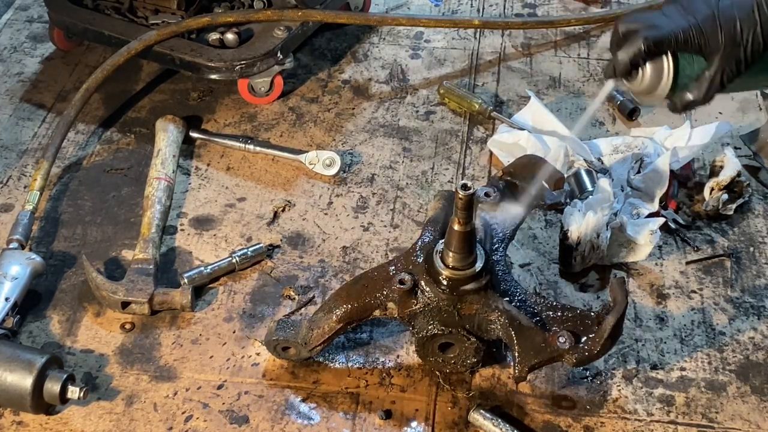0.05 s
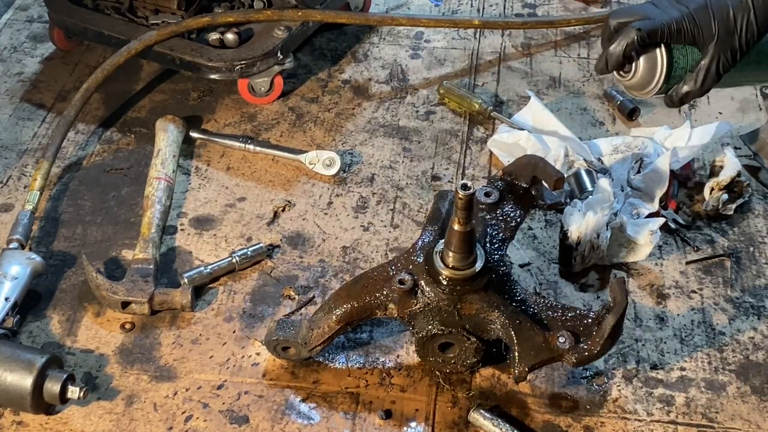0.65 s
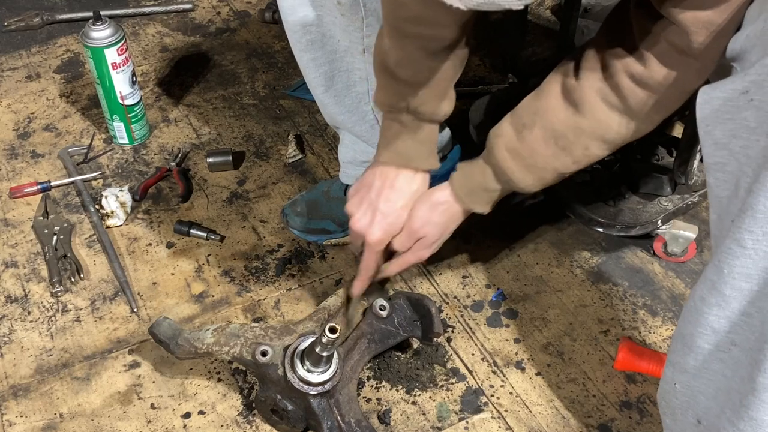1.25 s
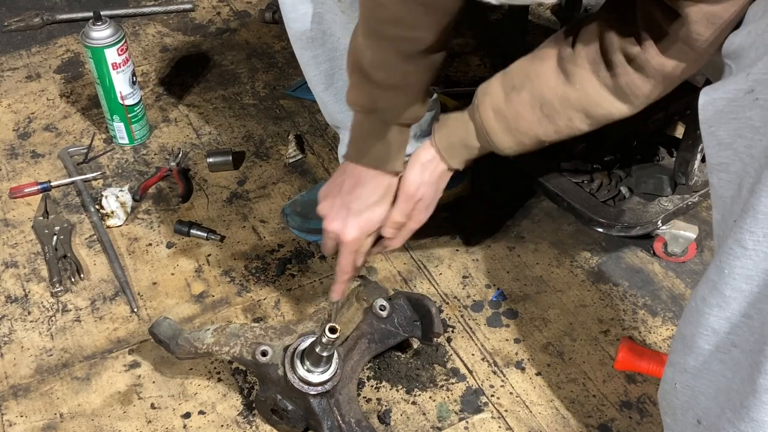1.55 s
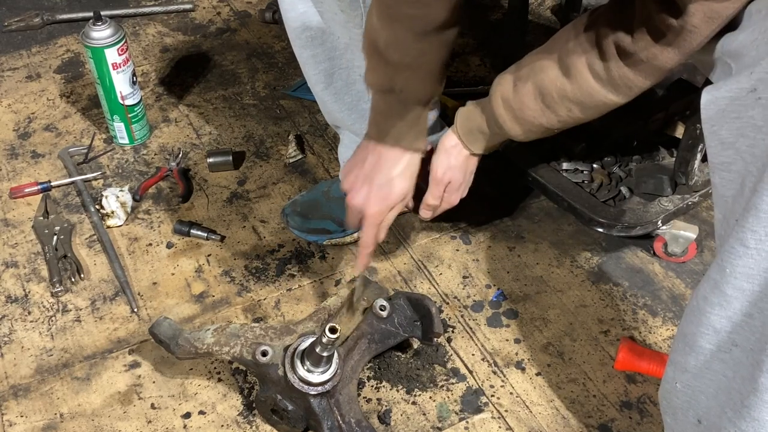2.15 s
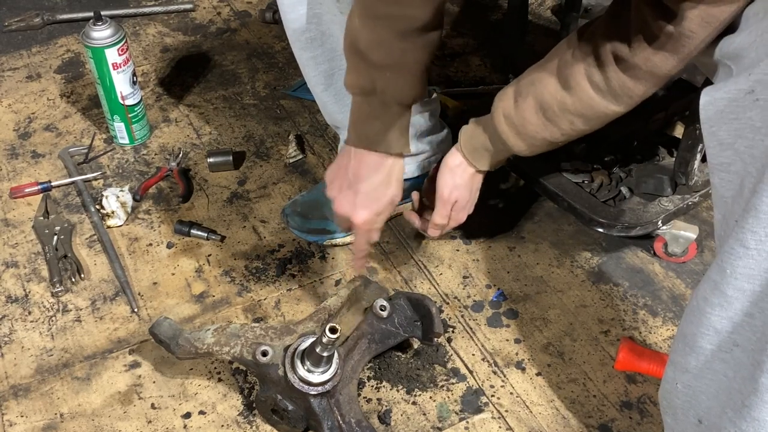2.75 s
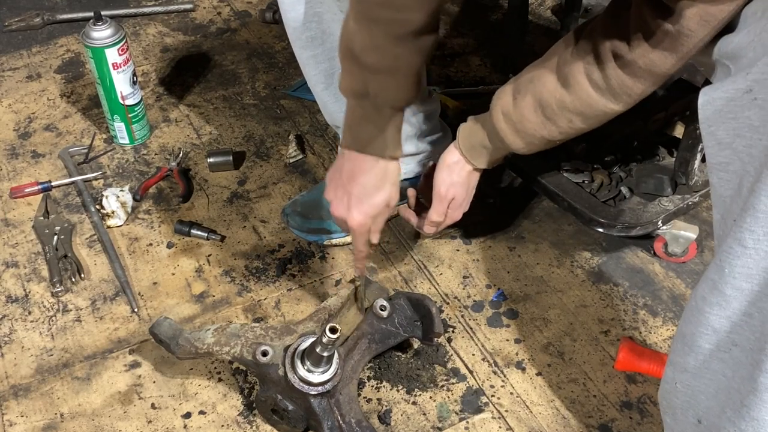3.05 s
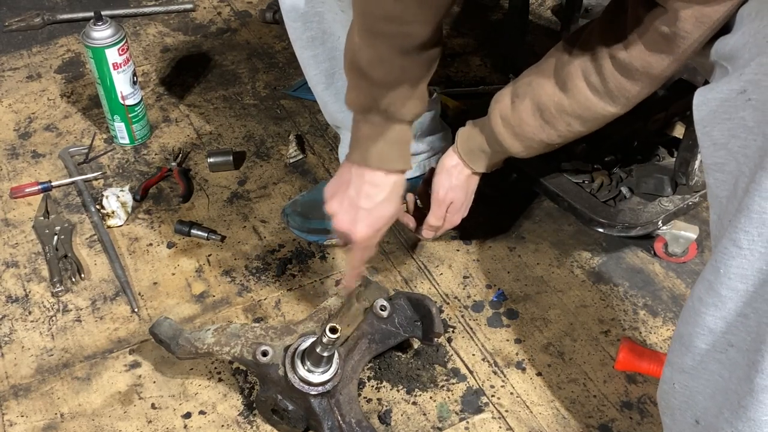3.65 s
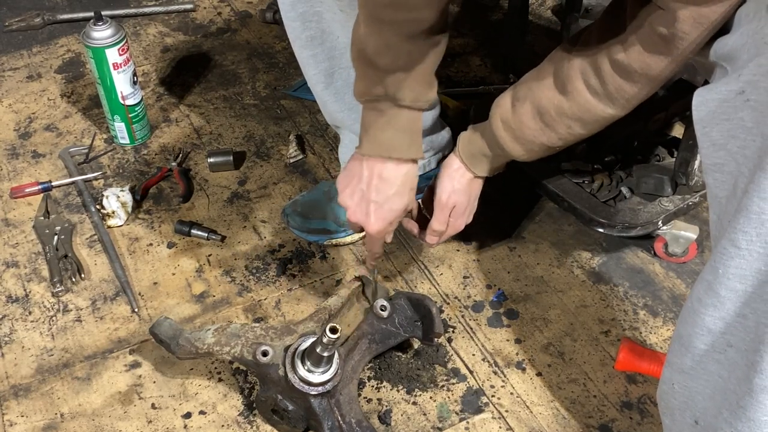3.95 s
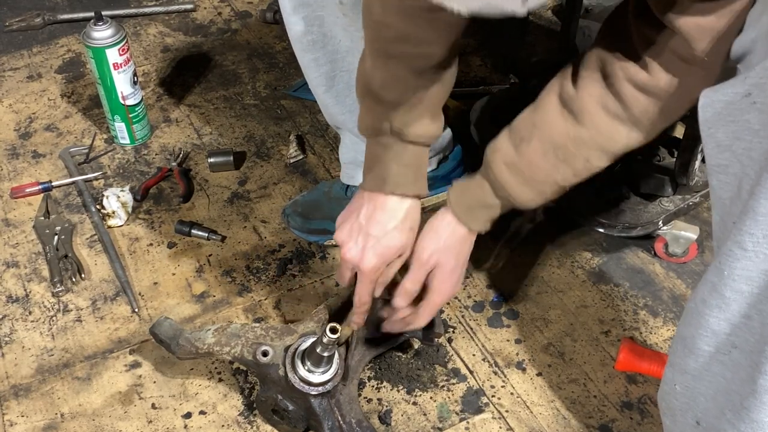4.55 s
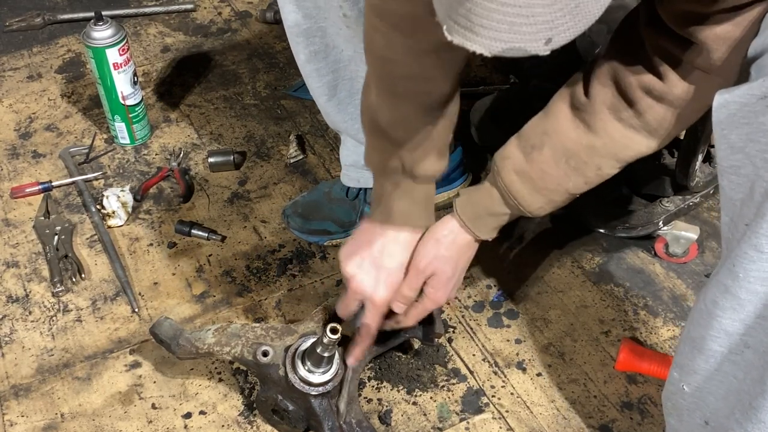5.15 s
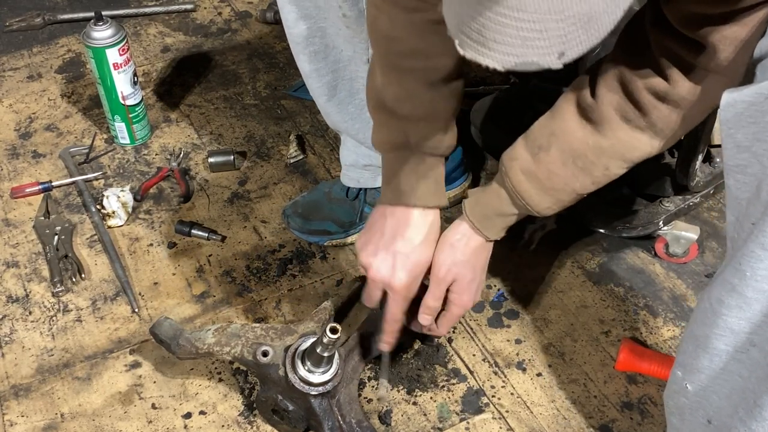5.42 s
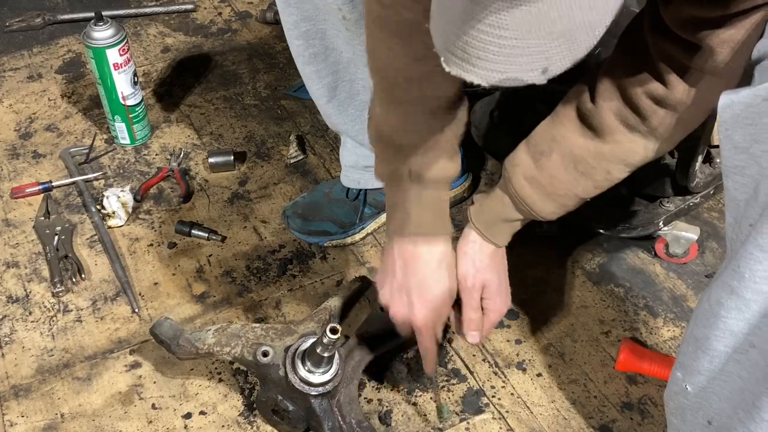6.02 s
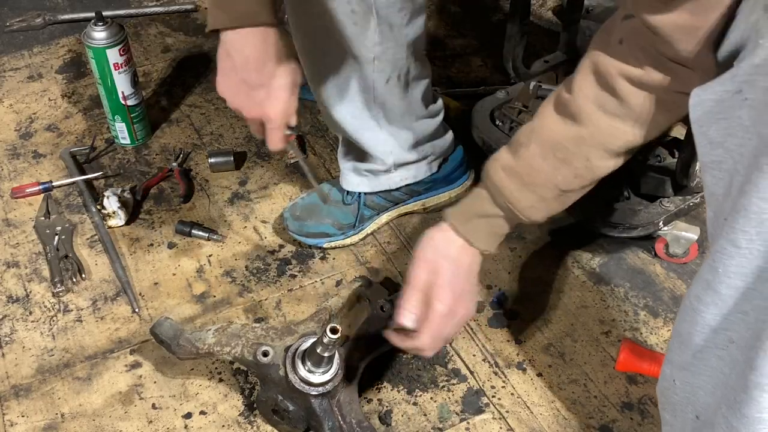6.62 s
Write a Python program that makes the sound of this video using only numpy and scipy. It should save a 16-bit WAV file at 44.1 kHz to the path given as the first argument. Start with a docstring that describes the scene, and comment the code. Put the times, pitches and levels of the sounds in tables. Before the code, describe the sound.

A brief spray hiss and heater roar cut off, followed by short wire brush scrapes on faintly ringing steel in a workshop.

```python
"""Spray cleaning and wire brushing

An aerosol can sprays a steel steering knuckle over the roar of a shop heater; then the scene changes. A hand
wire brush scrubs the knuckle in short strokes. Wires tick as they land and rasp as they slip, the casting rings
differently at each spot, and the workshop reflects the ticks and rasp."""
import sys
import numpy as np
from scipy import signal
from scipy.fft import rfft, irfft
from scipy.io import wavfile
from scipy.ndimage import uniform_filter1d

SR = 44100
rng = np.random.default_rng(int(sys.argv[2]) if len(sys.argv) > 2 else 0)


def unload_wav(signal):
    """Save mono or channel-first audio to the path in sys.argv[1] as 16-bit WAV at rate SR, clipped to [-1, 1]."""
    wavfile.write(
        sys.argv[1],
        SR,
        np.round(np.clip(np.atleast_2d(signal).T, -1, 1) * 32767).astype(np.int16),
    )


N = 298987
TIME_S = np.arange(N) / SR
FREQS_HZ = np.fft.rfftfreq(N, 1 / SR)

# Table levels are relative.
# brush strokes: start_s, length_s, level_db, wire_hz, ring_db
BRUSH_STROKES = [ (0.896, 0.015, -32, 1730, 6), (0.955, 0.087, -47.5, 1850, 8), (1.174, 0.15, -26, 2870, 2),
                 (1.554, 0.087, -23, 3000, 3), (1.919, 0.059, -21.5, 3750, 3),
                 (2.249, 0.022, -22.5, 2780, 4), (2.288, 0.036, -33.5, 2800, 14),
                 (2.615, 0.092, -22, 3660, -5), (2.945, 0.046, -20, 3280, 4.5),
                 (3.207, 0.061, -30, 3240, 9.5), (3.415, 0.01, -23.5, 2680, -6),
                 (3.437, 0.029, -15.5, 3670, -2.5), (3.642, 0.038, -17, 3600, -0.5),
                 (3.857, 0.033, -16.5, 3420, 7.5), (4.563, 0.084, -52, 1800, 3.5),
                 (4.744, 0.13, -36, 1330, 1.5), (4.933, 0.082, -34.5, 1460, 0),
                 (5.078, 0.094, -30, 3040, -4.5), (5.223, 0.067, -34.5, 1420, -9),
                 (5.593, 0.068, -25, 4140, 2.5), (5.934, 0.035, -19.5, 4197, 8),
                 (6.2, 0.01, -35, 2104, -5.5), ]
# head landing or wire snapping free: start_s, level_db, wire_hz
WIRE_TICKS = [(0.8943, -39.5, 3900), (1.011, -30.5, 3900), (1.056, -30, 3560), (1.0985, -28.5, 1840),
              (1.1512, -13.5, 2650), (1.1875, -17, 3010), (1.2241, -13.5, 2880), (1.2642, -21.5, 2700),
              (1.5166, -27, 2200), (1.5645, -19, 3700), (1.5823, -15.5, 3740), (1.783, -35.5, 8500),
              (1.8736, -28.5, 3570), (1.9389, -16.5, 3800), (2.2267, -17.5, 3500), (2.2582, -16, 3770),
              (2.318, -23.5, 2730), (2.578, -30, 1800), (2.6318, -15.5, 3600), (2.8919, -34.5, 3570),
              (3.0002, -15, 3644), (3.1271, -33.5, 2120), (3.2082, -20.5, 3800), (3.2165, -12, 3800),
              (3.316, -28, 3480), (3.3828, -24.5, 2680), (3.419, -16, 3500), (3.4407, -10.5, 3700),
              (3.6274, -14, 3500), (3.848, -12, 2658), (3.9489, -18, 3350), (4.558, -32, 2130),
              (5.227, -20.5, 2300), (5.598, -26.5, 3040), (5.656, -13, 4400), (5.9294, -17.5, 2900),
              (6.2102, -22.5, 4060), (6.263, -29.5, 4000)]
# wire on steel: freq_hz, level_db
RASP_SPECTRUM = [(100, -33.5), (300, -18), (620, -15.5), (1020, -6), (1500, -5.5), (2300, 2), (4100, -2.5),
                 (5200, -5), (6900, -5), (7600, -9), (9000, -9), (10500, -22.5), (12000, -17),
                 (14000, -39.5)]
# brush head resonances: freq_hz, half_width_hz, boost_db
HEAD_MODES = [(1100, 100, 4), (2704, 110, 4), (3547, 100, 2.5), (3753, 162, 5.5), (3945, 130, 5.5),
              (4320, 52, 5.5)]
# knuckle modes (lowest two with the floor boards) and their level at each brushed spot:
# freq_hz, t60_s, arm_db, flank_db, hub_db, rim_db, tip_db
KNUCKLE_MODES = [ (271.5, 0.35, -41.5, -25.5, -31, -38, -42), (427, 0.17, -40, -24.5, -29, -60, -42),
                 (812, 0.32, -42, -22.5, -35, -29.5, -29), (1286, 0.75, -26, -18.5, -27, -20.5, -6),
                 (1398, 1.09, -40, -20.5, -20, -24.5, -35), (1682, 0.48, -29, -13.5, -8.5, -24, -11.5),
                 (1842, 0.35, -24, -13.5, -20, -38, -9), (2150, 0.3, -35, -28, -35, -26, -14),
                 (2414, 0.83, -44.5, -27, -31, -33.5, -8), (2680, 0.28, -25, -27, -23, -36, -33),
                 (3190, 0.27, -34.5, -13, -14, -55, -44), (3890, 0.35, -40.5, -21, -10.5, -23, -25),
                 (4080, 0.19, -39.5, -20, -25, -16.5, -10), (4073, 0.33, -39, -21, -10.5, -24, -12),
                 (4300, 0.35, -38.5, -19, -10, -23, -22.5), (4810, 0.47, -32.5, -32, -43, -26, -39),
                 (5430, 0.4, -41.5, -36, -23, -43, -16), (5522, 0.4, -38, -28, -23, -15, -30),
                 (5469, 0.3, -42, -32, -36, -19, -29), (5868, 0.49, -42, -32, -38, -26, -17),
                 (8800, 0.16, -50.5, -25, -14, -43, -31), (9750, 0.17, -47.5, -33, -13.5, -24, -34), ]
# brush moves to the next spot: time_s
SPOT_MOVES_S = [4.4, 5.5, 5.9, 6.19]
# rasp brightness per spot: treble_db
TREBLE_BY_SPOT_DB = [2, 2, -3.5, -0.5, 0]
# low shelf per spot: body_db
BODY_BY_SPOT_DB = [-1, 0.5, -2.5, -3, -7]
# head resonance per spot, strongest lying flat on the arm: boost_share
HEAD_SHARE_BY_SPOT = [0.9, 0.12, 0.27, 0.16, 0.18]
# light knocks as the brush is placed: start_s, level_db
KNOCKS = [(0.895, -45), (0.95, -44), (1.1, -37.5)]
# aerosol jet: freq_hz, level_db
JET_SPECTRUM = [(500, -19), (1500, 3.5), (2650, 5.5), (3100, 2), (4500, 1.5), (6200, 3), (8000, 2),
                (12000, 0.5), (13400, -7), (16000, -4)]
# heater flame: freq_hz, level_db
ROAR_SPECTRUM = [(25, -39), (42, -7), (60, 0), (120, 3), (175, -3), (320, 3), (450, -2), (540, -8),
                 (900, -17), (2200, -25.5), (3500, -36), (16000, -65)]
# heater duct resonances: freq_hz, half_width_hz, level_db
DUCT_MODES = [(211, 7, -8.5), (272.3, 2.8, -6.5), (297.3, 9.9, -5), (387, 11, -13), (418.5, 7.9, -11.5),
              (1403, 27, -23.5)]
# arm movements: middle_s, half_length_s, rustle_db, rumble_db
ARM_MOVES = [(0.797, 0.034, -47, -68), (0.974, 0.12, -48, -52), (4.855, 0.071, -47, -49),
             (5.14, 0.17, -48, -61), (6.676, 0.16, -59.5, -77)]
# sleeve rustle: freq_hz, level_db
SLEEVE_SPECTRUM = [(150, -1), (400, 1.5), (2000, -3), (2650, 2.5), (3300, -1.5), (6000, -5.5), (9500, -8),
                   (12000, -15), (15000, -24.5)]
# quiet shop: freq_hz, level_db
AIR_SPECTRUM = [(15, -50), (25, -14), (82, 1), (130, -10.5), (175, -12), (200, -10), (256, -13.5),
                (317, -14), (489, -19), (1290, -30.5), (1480, -23), (2910, -48.5), (14400, -49.5),
                (16000, -54)]
# room decay: freq_hz, t60_s
ROOM_DECAY = [(250, 0.63), (700, 0.41), (1700, 0.29), (4500, 0.29), (9000, 0.31), (14000, 0.26)]


def brush_strokes(slips_per_s=4000, spread_db=4, clump_db=1.5, clump_hz=150,
                  touch_share=0.15, hardest_share=0.73, land_db=-7.5, lift_db=-3.5, release_s=0.011):
    """Wires catch and slip in clumps as pressure swells. Returns rasp and power fed to the steel."""
    rasp, power = np.zeros((2, N))
    sizes = amp(spread_db * np.minimum(rng.exponential(1, N), 4)) * rng.choice([-1, 1], N)
    slipping = rng.random(N) < slips_per_s / SR
    slips = unit_rms(sizes * slipping * amp(clump_db * flutter(clump_hz)))
    for start_s, length_s, level_db, wire_hz, ring_db in BRUSH_STROKES:
        span = slice(round(start_s * SR), round((start_s + length_s + .1) * SR))
        t = TIME_S[span] - start_s
        pressure = amp(level_db + np.interp(t / length_s, [0, hardest_share, 1], [land_db, 0, lift_db]))
        pressure *= np.clip(t / (touch_share * length_s), 0, 1)  # wires land one after another
        pressure *= np.exp(-np.maximum(t - length_s, 0) / release_s)
        drive = unit_rms(slips[span] * pressure) * np.sqrt(np.mean(pressure ** 2))
        click = wire_click(start_s, wire_hz, TREBLE_BY_SPOT_DB[spot_at(start_s)])
        add(rasp, start_s, signal.fftconvolve(drive, click))
        add(power, start_s, (pressure * amp(ring_db)) ** 2)
    return rasp, power


def wire_ticks(gain_db=18, ring_db=-2, scatter=0.089, scatter_s=0.0079, size=600,
               neutral_hz=3680, treble_db_per_octave=9.5):
    """One hard contact, then neighbouring wires land. Returns ticks and power fed to the steel."""
    ticks, power = np.zeros((2, N))
    for start_s, level_db, wire_hz in WIRE_TICKS:
        contact = scatter * rng.standard_normal(size) * np.exp(-TIME_S[:size] / scatter_s)
        contact[0] = 1
        treble_db = treble_db_per_octave * np.log2(wire_hz / neutral_hz)  # shorter wires are brighter
        tick = signal.fftconvolve(contact, wire_click(start_s, wire_hz, treble_db))
        tick *= amp(level_db + gain_db) / np.linalg.norm(tick)
        add(ticks, start_s, tick)
        add(power, start_s, (tick * amp(ring_db)) ** 2)
    return ticks, power


def wire_click(start_s, wire_hz, treble_db, wire_db=6, half_width_hz=350,
               treble_hz=5000, body_hz=750, flex_share=0.036, ripple_db=2.5, size=4096):
    """One wire slips: a unit-energy click coloured by its tuft and the brush head."""
    hz = np.fft.rfftfreq(size, 1 / SR)
    spot = spot_at(start_s)
    level_db = curve(RASP_SPECTRUM, hz) + wire_db * resonance(hz, wire_hz, half_width_hz)
    flex = 1 + flex_share * rng.uniform(-1, 1)  # grip detunes the head at each contact
    head_db = sum(db * resonance(hz, mode_hz * flex, half_hz) for mode_hz, half_hz, db in HEAD_MODES)
    level_db += HEAD_SHARE_BY_SPOT[spot] * head_db
    level_db += treble_db * hz ** 4 / (hz ** 4 + treble_hz ** 4)
    level_db += BODY_BY_SPOT_DB[spot] / (1 + (hz / body_hz) ** 4)
    overtones = uniform_filter1d(rng.standard_normal(len(hz)), size=9)  # other wires touch each time
    overtones = unit_rms(uniform_filter1d(overtones, size=7))
    level_db += ripple_db * overtones * np.minimum(hz / treble_hz, 1)
    cepstrum = irfft(np.log(amp(level_db)))
    click = irfft(np.exp(2 * rfft(cepstrum[:size // 2], size)))[:size // 2]  # minimum phase
    return click / np.linalg.norm(click)


def knuckle_ring(power, fill_s=0.03):
    """Small kicks build energy in each mode, by how much it moves at the brushed spot."""
    spot, ring = spot_at(TIME_S), np.zeros(N)
    for hz, t60_s, *spot_db in KNUCKLE_MODES:
        retained = np.exp(-2 * np.log(1000) / (t60_s * SR))
        drive = power * amp(spot_db)[spot] ** 2 + 1e-20
        energy = signal.lfilter([1 / (fill_s * SR)], [1, -retained], drive)
        ring += np.sqrt(2 * energy) * np.sin(2 * np.pi * (hz * TIME_S + rng.random()))
    return ring


def knock_chinks(pitch_hz=1860, t60_s=0.25):
    """Each light knock leaves one thin, dying tone in the steel."""
    chinks, t = np.zeros(N), TIME_S[:SR]
    tone = np.exp(-np.log(1000) * t / t60_s) * np.sin(2 * np.pi * pitch_hz * t)
    for start_s, level_db in KNOCKS:
        add(chinks, start_s, amp(level_db) * tone)
    return chinks


def aerosol(open_db=-36.5, ease_at_s=0.43, ease_s=0.12, ease_db=-8, sputter_db=1, sputter_hz=300,
            chirp_at_s=0.126, chirp_half_s=0.0043, chirp_hz=2620, chirp_db=-29):
    """The jet hisses, sputters with droplets and chirps once; then the finger eases off."""
    eased = np.clip((TIME_S - ease_at_s) / ease_s, 0, 1)
    jet_db = open_db + ease_db * eased + sputter_db * flutter(sputter_hz)
    hiss = amp(jet_db) * spectrum_noise(JET_SPECTRUM)
    chirp = amp(chirp_db) * swell(chirp_at_s, chirp_half_s) * np.sin(2 * np.pi * chirp_hz * TIME_S)
    return hiss + chirp


def heater(gain_db=-23, roar_gain_db=-4, waver_db=1.07, waver_hz=6.7):
    """A wavering, turbulent flame roars and excites narrow duct resonances."""
    roar = amp(roar_gain_db) * spectrum_noise(ROAR_SPECTRUM)
    duct = sum(amp(db) * noise(resonance(FREQS_HZ, hz, half_hz)) for hz, half_hz, db in DUCT_MODES)
    return amp(gain_db + waver_db * flutter(waver_hz)) * (roar + duct)


def room_echoes(sound, first_s=0.00079, build_s=0.0036, taps_per_s=5000):
    """Dense reflections off floor, tools and walls; each band decays at its own rate."""
    taps = rng.choice([-1, 1], SR) * (rng.random(SR) < taps_per_s / SR)
    build_up = 1 - np.exp(-np.maximum(TIME_S[:SR] - first_s, 0) / build_s)
    hz, t, bands = signal.stft(taps * build_up, SR, nperseg=256)
    decay = np.exp(-np.log(1000) * t / curve(ROOM_DECAY, hz)[:, None])
    tail = signal.istft(bands * decay, SR)[1]
    return signal.fftconvolve(sound, tail / np.linalg.norm(tail))[:N]


def shop_background(air_db=-60.5, rest_rustle_db=-66, rest_rumble_db=-61, move_rumble_gain_db=-3,
                    rumble_hz=80, half_width_hz=35, crease_db=1, crease_hz=60):
    """Still air, plus low rumble and sleeve rustle that swell as the arms move."""
    rustle_gain, rumble_gain = amp(rest_rustle_db), amp(rest_rumble_db)
    for middle_s, half_length_s, rustle_db, rumble_db in ARM_MOVES:
        move = swell(middle_s, half_length_s)
        rustle_gain += amp(rustle_db) * move
        rumble_gain += amp(rumble_db + move_rumble_gain_db) * move
    air = amp(air_db) * spectrum_noise(AIR_SPECTRUM)
    rumble = rumble_gain * noise(resonance(FREQS_HZ, rumble_hz, half_width_hz))
    sleeves = rustle_gain * amp(crease_db * flutter(crease_hz)) * spectrum_noise(SLEEVE_SPECTRUM)
    return air + rumble + sleeves


def spot_at(time_s):
    """Index of the spot under the brush."""
    return np.searchsorted(SPOT_MOVES_S, time_s)


def amp(db):
    """Decibels to gain."""
    return 10 ** (np.asarray(db) / 20)


def unit_rms(x):
    """Scales to rms 1."""
    return x / np.sqrt(np.mean(x ** 2) + 1e-20)


def curve(points, hz):
    """Interpolates (freq_hz, value) rows over log frequency."""
    points_hz, values = np.transpose(points)
    return np.interp(np.log(hz + 1), np.log(points_hz + 1), values)


def resonance(hz, centre_hz, half_width_hz):
    """Lorentzian peak of height 1."""
    return 1 / (1 + ((hz - centre_hz) / half_width_hz) ** 2)


def swell(middle_s, half_s):
    """Gaussian envelope of height 1."""
    return np.exp(-((TIME_S - middle_s) / half_s) ** 2)


def add(mix, start_s, sound):
    """Mixes a sound in at start_s."""
    part = mix[round(start_s * SR):][:len(sound)]
    part += sound[:len(part)]


def noise(gain):
    """Unit-rms noise shaped by a gain per frequency."""
    return unit_rms(irfft(rfft(rng.standard_normal(N)) * gain, N))


def spectrum_noise(spectrum):
    """Unit-rms noise shaped by (freq_hz, level_db) rows."""
    return noise(amp(curve(spectrum, FREQS_HZ)))


def flutter(rate_hz):
    """Unit-rms random drift up to rate_hz."""
    return noise(1 / (1 + (FREQS_HZ / rate_hz) ** 4))


def scene(spray_end_s=0.759, direct_db=0.5, rasp_room_db=-4, tick_room_db=-3):
    """Spray and heater first, then brushing."""
    rasp, rasp_power = brush_strokes()
    ticks, tick_power = wire_ticks()
    echoes = room_echoes(amp(rasp_room_db) * rasp + amp(tick_room_db) * ticks)
    steel = knuckle_ring(rasp_power + tick_power) + knock_chinks()
    brushing = amp(direct_db) * (rasp + ticks) + echoes + steel + shop_background()
    spraying = heater() + aerosol()
    spray_gate = uniform_filter1d((TIME_S < spray_end_s) * 1., size=64)
    return (spray_gate * spraying + (1 - spray_gate) * brushing)[None]


def record(dry):
    """Steep low-pass at 15.9 kHz."""
    lowpass = signal.firwin(511, 15900, window=("kaiser", 9), fs=SR)
    return signal.oaconvolve(dry, lowpass[None], "same")


dry = scene()
out = record(dry)
unload_wav(out)
```